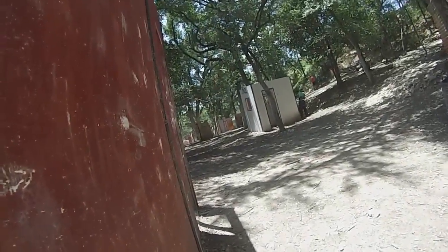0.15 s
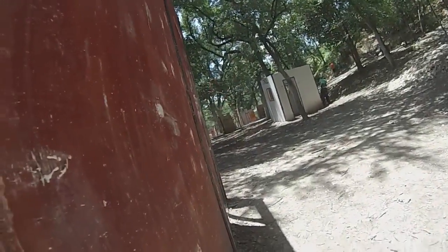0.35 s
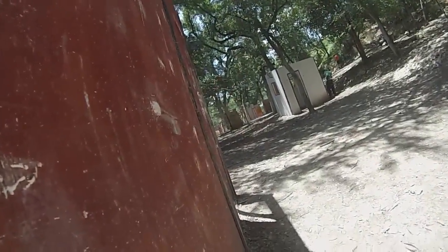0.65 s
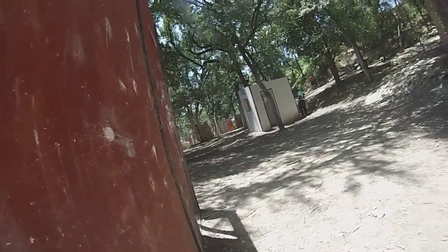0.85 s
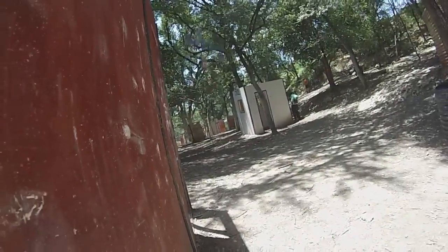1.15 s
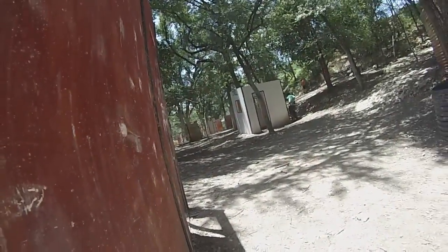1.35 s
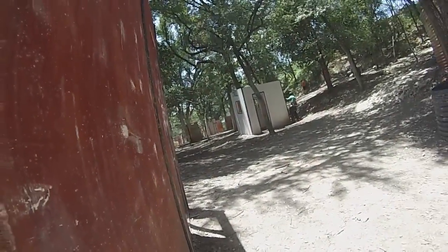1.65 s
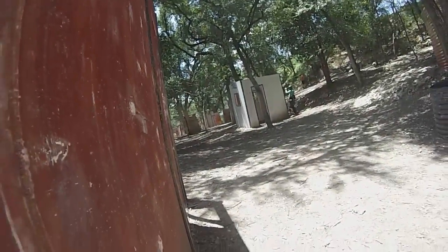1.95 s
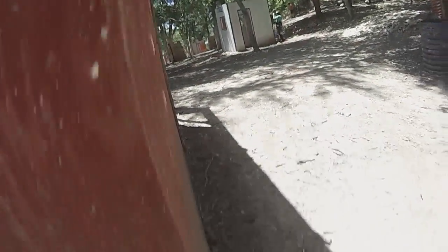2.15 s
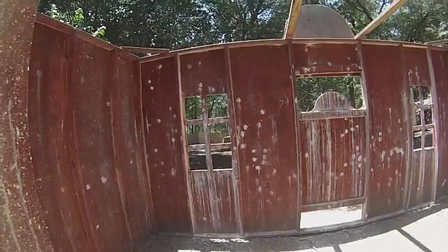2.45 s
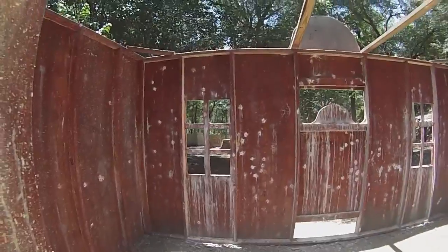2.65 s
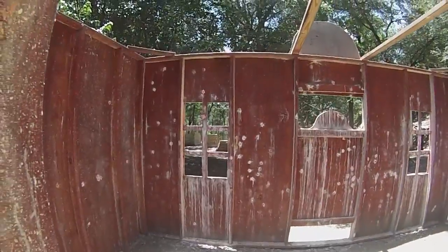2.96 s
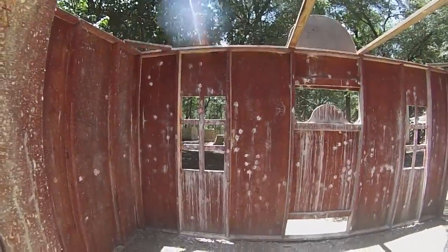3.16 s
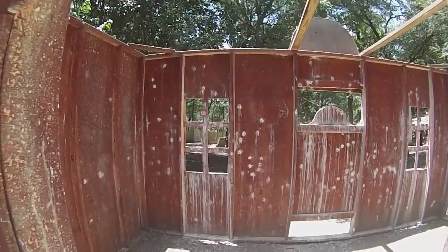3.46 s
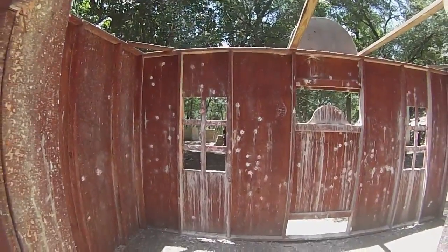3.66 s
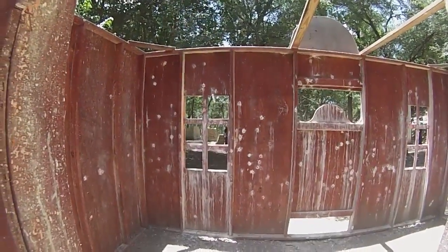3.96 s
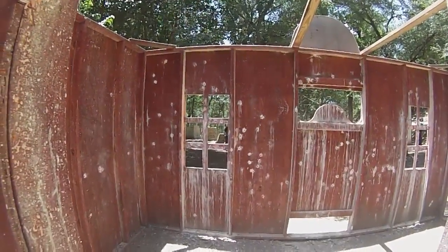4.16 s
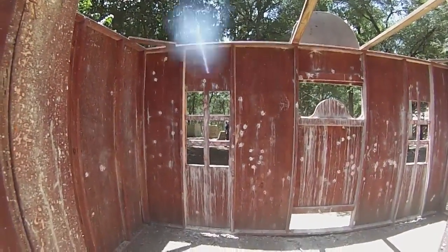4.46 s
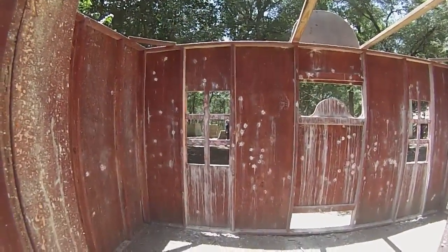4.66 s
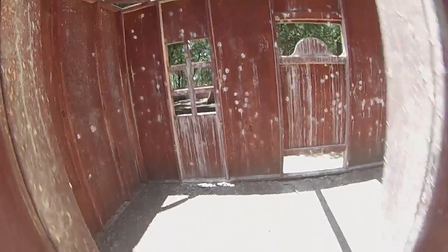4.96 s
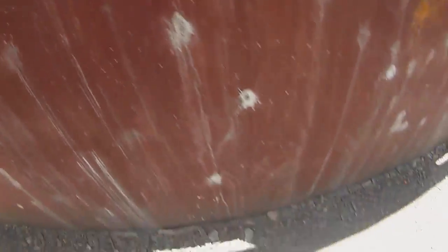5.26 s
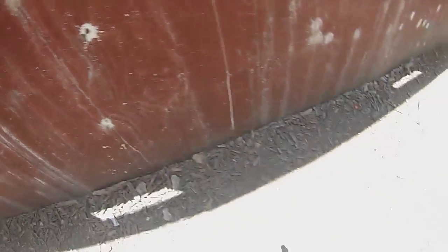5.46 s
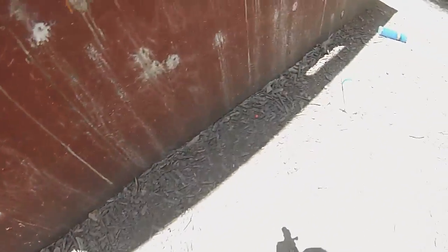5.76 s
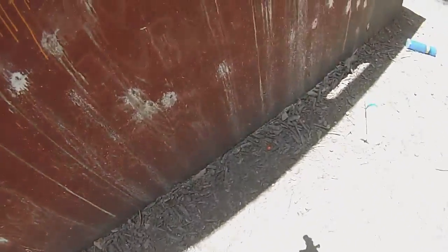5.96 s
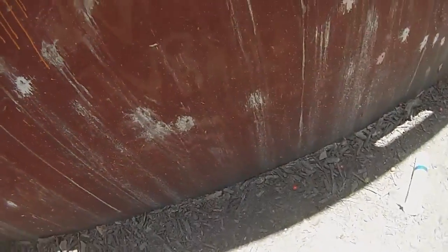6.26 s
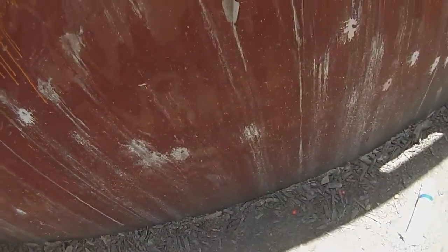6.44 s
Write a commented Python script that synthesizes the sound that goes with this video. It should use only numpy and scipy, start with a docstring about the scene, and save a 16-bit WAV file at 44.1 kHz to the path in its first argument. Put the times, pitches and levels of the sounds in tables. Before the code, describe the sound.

A paintball gun hammers out metallic shots at about thirteen a second, pauses with hollow knocks, fires again, then just rattles and bumps.

```python
"""Inside a closed housing clamped to a paintball marker, a microphone hears quick strings of shots through the mount.
Each shot excites body resonances with noisy metal contacts, as the trigger clicks and the bolt slams and returns;
a thin ring, a shove of recoil and a hiss of spent gas follow. Around the strings, random ball contacts ring
the hopper shell, handling shakes the springy mount and cloth and hands rustle faintly.
The capsule saturates, and gain control ducks the loud sounds, quickly down and slowly back."""
import sys
import numpy as np
from scipy import signal
from scipy.fft import rfft, irfft
from scipy.io import wavfile

SR = 44100
rng = np.random.default_rng(int(sys.argv[2]) if len(sys.argv) > 2 else 0)


def file_out(sig):
    """Save sig as 16-bit WAV at sys.argv[1]."""
    # one column per channel
    cols = np.atleast_2d(sig).T
    # limit, then scale
    lim = np.clip(cols, -1, 1)
    pcm = np.round(lim * 32767).astype(np.int16)
    wavfile.write(sys.argv[1], SR, pcm)


N = 291040  # samples

# Levels are in dB before the capsule and gain control; some sources add a fixed gain to theirs.
# Shots, with the bolt's return: start_s, slam_db, return_delay_ms, return_db
SHOT_CYCLES = [(0.0605, 4, 9.8, 5.5), (0.1354, 5.5, 10.4, 11.5), (0.3432, 9.5, 10.1, 11.5),
               (0.415, 12, 10.1, 14), (0.4934, 11.5, 9.6, 9), (0.6275, 9.5, 10.3, 13),
               (0.718, 6, 9.8, 12.5), (0.7951, 9.5, 10.5, 12), (0.8664, 11, 9.7, 14),
               (0.9388, 8.5, 10.8, 12.5), (1.0223, 10.5, 10, 13.5), (1.098, 11.5, 9.7, 13.5),
               (1.165, 11.5, 9.7, 13), (1.2345, 12.5, 10.8, 14.5), (1.3075, 8.5, 10.1, 9),
               (1.3879, 8.5, 10.1, 12), (1.4738, 9.5, 9.8, 12), (1.5382, 10, 10.6, 9.5),
               (1.615, 11, 9.4, 13), (1.6886, 9, 9.7, 13.5), (1.7592, 11.5, 9.3, 14), (1.8286, 9.5, 10, 13),
               (2.9742, 17, 10, 18), (3.2293, 14.5, 9.7, 16.5), (3.3088, 11, 9.5, 12.5),
               (3.448, 8.5, 10.2, 13.5), (3.545, 7, 9.5, 11.5), (3.6198, 8, 9.8, 14),
               (3.6868, 10, 9.6, 10.5), (3.7592, 10.5, 9.6, 12), (3.859, 8.5, 10, 12.5),
               (3.9455, 8.5, 9.9, 11.5), (4.0159, 10, 9.4, 13.5), (4.0849, 12, 9.9, 10),
               (4.1501, 7.5, 9.6, 12), (4.2505, 10, 10.2, 13.5), (4.3872, 7, 9.6, 11.5),
               (4.4645, 8, 9.6, 10), (4.5275, 11.5, 9.5, 13), (4.6271, 9.5, 10.3, 12.5)]
# Other bright ticks of trigger and bolt: start_s, level_db
TRIGGER_BOLT_TICKS = [(0.0004, 1.5), (0.226, -9.5), (0.2414, -7.5), (0.264, 4.5), (0.374, -9),
                      (0.462, -11.5), (0.5593, 7.5), (0.668, -8.5), (0.749, -10), (0.8932, -10),
                      (0.9646, -7.5), (1.0514, -12), (1.2675, -10), (1.943, -21.5), (2.9455, -17),
                      (2.9524, -9), (2.9571, -2), (2.962, -1.5), (2.9685, -1), (3.2181, -5.5), (3.2216, -5),
                      (3.266, -9), (4.0484, -16), (4.6943, -17), (4.9222, -36.5), (5.0463, -40),
                      (5.253, -39), (5.5115, -36), (6.1745, -36)]
# Small contacts in every cycle: before_slam_ms, level_db, hold_ms
LEAD_IN_CONTACTS = [(20.3, -35.5, 1.4), (17.07, -25, 0.45), (11.1, -16, 3.8), (5.13, -19.5, 7.0)]
# Marker body heard through the housing: pitch_hz, width_hz, level_db
BODY_MODES = [(373, 227, -9.5), (790, 820, -9.5), (1358, 295, -4), (2102, 253, -4.5), (2573, 358, -2),
              (3441, 232, 0), (4270, 770, -16.5), (6166, 300, -16.5), (8500, 2400, -32),
              (11500, 9000, -59.5)]
# Relative spectrum of the gas hiss: pitch_hz, density_db (per Hz)
GAS_SPECTRUM = [(710, -39.5), (1200, 4), (1290, -14.5), (1470, -5.5), (1970, -9), (2600, -2), (3310, -8.5),
                (3620, -11), (3920, -25), (5610, -15), (6170, -20), (6790, -22), (8210, -16.5),
                (15000, -51)]
# Loudest knocks of balls on the hopper shell: start_s, level_db, brightness_db
BALL_KNOCKS = [(0.29, -27, 22), (1.901, -21.5, 20), (2.066, -32.5, 22), (2.12, -21, 13), (2.252, -22, 0.5),
               (2.275, -19.5, 13.5), (2.372, -6, 4), (2.418, -18.5, 13), (2.463, -10.5, 0),
               (2.516, -13.5, -2), (2.537, -13.5, 2), (2.567, -12.5, 1), (2.592, -13, -6),
               (2.653, -16.5, -12), (2.683, -26.5, -8), (2.747, -24, 0.5), (2.772, -22, -1),
               (2.869, -20, -3), (2.939, -8, 4), (3.994, -20, 5), (4.065, -17, 5), (4.991, -14.5, 0.5),
               (5.253, -29.5, -0.5), (5.384, -7, 0.5), (5.473, -9.5, 3.5), (5.548, -11.5, 6),
               (5.593, -8.5, 8), (5.636, -12.5, 3.5), (5.67, -16, 6.5), (5.733, -9.5, 5),
               (5.778, -16.5, -5), (5.853, -13, -2), (5.893, -17, 4), (5.991, -6, -1), (6.006, -9.5, 6),
               (6.084, -5.5, 4.5), (6.121, -8.5, -1), (6.139, -10, -1.5), (6.155, -15, 4),
               (6.177, -7.5, -1), (6.23, -15, 3), (6.26, -17.5, 5.5), (6.303, -26.5, 8),
               (6.367, -12.5, 6.5), (6.548, -6, -11), (6.572, -14, 1)]
# Hopper shell resonances: pitch_hz, width_hz, level_db
SHELL_MODES = [(300.5, 180, -10), (546, 54, 3.5), (810, 115, 3.5), (1184, 281, -4.5), (1676, 230, -15.5),
               (2037, 280, -15), (2700, 726, -23.5), (3870, 1600, -46), (6300, 230, -47)]
# How hard the marker is shaken: time_s, thrum_db (mount), tumble_db (balls)
SHAKING = [(0.0, -37, -69), (0.15, -34, -48), (0.25, -30.5, -34), (0.45, -30.5, -39.5), (1.748, -26.5, -36),
           (1.88, -36, -33.5), (2.03, -27, -36), (2.2, -30, -35), (2.429, -18, -28.5), (2.58, -26, -44),
           (2.85, -30.5, -50), (2.931, -11, -23), (3.0, -27.5, -33), (3.2, -30, -39.5), (4.55, -32, -36.5),
           (4.681, -28.5, -39.5), (4.95, -28, -32), (5.11, -25.5, -32.5), (5.21, -34, -50),
           (5.33, -16.5, -24.5), (5.53, -17.5, -27), (5.649, -24, -34.5), (5.779, -20.5, -40),
           (5.95, -15.5, -21.5), (6.1, -14, -27.5), (6.32, -22.5, -39), (6.44, -24, -34), (6.6, -11, -20.5)]
# Jolts that set the mount swinging: start_s, level_db
MOUNT_JOLTS = [(1.99, -25), (2.299, -19.5), (2.422, -2.5), (2.468, -12.5), (2.521, -14), (2.69, -16),
               (2.89, -24), (2.925, -22), (2.96, -4), (5.508, -6.5), (5.537, -18), (5.629, -6), (5.703, -6),
               (5.808, -9), (5.916, 2), (6.18, -2.5), (6.398, -9), (6.552, -12)]
# Mount resonances: pitch_hz, width_hz, level_db
MOUNT_MODES = [(55, 40, -22), (99, 13, 0), (135, 24, -4), (200, 50, -22)]
# Faint treble rustle of cloth and hands: time_s, level_db
RUSTLE_LEVELS = [(0, -63), (2.05, -69), (2.35, -80), (2.9, -72.5), (4.75, -76), (5.9, -78.5), (6.37, -73.5),
                 (6.6, -65)]

# The trigger clicks ahead of each shot, fully after a pause, more softly the faster the finger goes.
TRIGGER_LEAD_MS, TRIGGER_DB, FULL_PULL_PAUSE_MS, TRIGGER_LOSS_DB_PER_MS = 25.7, -8.0, 99.0, 0.55
TICK_FALL_MS = 2.4
# Ring after each return: delay, mean height and spread from shot to shot
WHINE_AFTER_MS, WHINE_DB, WHINE_SPREAD_DB = 1.5, -28.0, 4.0
SNAP_S, SNAP_DB = 2.4224, -31.0
# The shaking comes in uneven lumps: rate and rms depth
LUMPS_PER_S, THRUM_LUMPS_DB, TUMBLE_LUMPS_DB = 9.0, 0.999, 1.11
CUTOFF_HZ = 16000


def amp(db):
    """Decibel law: convert a level in dB to a linear gain."""
    return 10 ** (np.asarray(db) / 20)


def rms_one(x):
    """Power normalisation: scale a signal to rms 1."""
    return x / np.sqrt(np.mean(x ** 2) + 1e-20)


def resonate(x, modes):
    """Modal superposition: parallel damped resonances with alternating signs."""
    out = 0
    for k, (hz, width, db) in enumerate(modes):
        r = np.exp(-np.pi * width / SR)
        sign = (-1) ** k
        b = sign * amp(db) * (1 - r * r) / 2 * np.array([1, 0, -1])
        a = [1, -2 * r * np.cos(2 * np.pi * hz / SR), r * r]
        out = out + signal.lfilter(b, a, x + 1e-18)
    return out


def bursts(times, dbs, holds_ms, fall_ms, rise_ms=0.22):
    """Transient envelope: a quick rise, a hold, then exponential decay, for every event."""
    out = np.zeros(N + 6000)
    t_ms = np.arange(6000) / SR * 1000
    for s, db, hold in np.broadcast(times, dbs, holds_ms):
        rise = np.minimum(t_ms / rise_ms, 1)
        fall = np.exp(-np.maximum(t_ms - hold, 0) / fall_ms)
        out[round(s * SR):][:6000] += amp(db) * rise * fall
    return out[:N]


def slow_noise(rate):
    """Low-passed randomness: noise of rms 1 that changes about rate times a second."""
    r = np.exp(-2 * np.pi * rate / SR)
    settled = signal.lfilter([1], [1, -2 * r, r * r], rng.standard_normal(N + 9000))[9000:]
    return rms_one(settled)


def flicker(rate, db):
    """Random amplitude modulation: a gain whose level wanders by db rms."""
    return amp(db * slow_noise(rate))


def repeated(times, share):
    """Partial coherence: contact noise partly alike in every cycle, since the same parts meet in the same way."""
    noise, pattern = rng.standard_normal(N + 400), rng.standard_normal(400)
    for at in np.round(times * SR).astype(int):
        fresh = noise[at:at + 400]
        noise[at:at + 400] = np.sqrt(share) * pattern + np.sqrt(1 - share) * fresh  # share of power
    return noise[:N]


def marker():
    """Impact excitation: metal contacts strike sharply, then chatter as short noise into the body resonances."""
    s, slam_db, lag_ms, return_db = np.transpose(SHOT_CYCLES)
    back = s + lag_ms / 1000
    noise = repeated(s, share=.4)
    contact = bursts(s, slam_db + 0.5, 2.32, fall_ms=0.62)
    contact += bursts(s, slam_db - 15.5, 0.84, fall_ms=2.7)
    for ms, db, hold in LEAD_IN_CONTACTS:
        contact += bursts(s - ms / 1000, db, hold, fall_ms=1.2)

    gap_ms = 1000 * np.diff(s, prepend=0)
    haste_ms = np.maximum(FULL_PULL_PAUSE_MS - gap_ms, 0)
    trigger_db = TRIGGER_DB - TRIGGER_LOSS_DB_PER_MS * haste_ms
    contact += bursts(s - TRIGGER_LEAD_MS / 1000, trigger_db, 0.42, fall_ms=TICK_FALL_MS)
    contact += bursts(*np.transpose(TRIGGER_BOLT_TICKS), 0.67, fall_ms=TICK_FALL_MS)

    strike = -bursts(s, slam_db + 5, 0.077, fall_ms=0.042, rise_ms=0.067)
    rebound = bursts(back, return_db, 2.7, fall_ms=2.41) * repeated(back, share=0.34)
    body = resonate(contact * noise + strike + rebound, BODY_MODES)
    # The bolt rings on at its own pitches after the return.
    bolt = resonate(rebound, [(3235, 110, 3.0), (6330, 130, -8.5), (2680, 52, -9.5)])
    return amp(9.5) * body + amp(7.0) * bolt


def gas():
    """Turbulent jet noise: spent gas hisses after each shot; an earlier shot's hiss is still dying at the start."""
    hz = np.maximum(np.arange(N // 2 + 1) * SR / N, 1)
    point_hz, point_db = np.transpose(GAS_SPECTRUM)
    colour = amp(np.interp(np.log(hz), np.log(point_hz), point_db))
    hiss = rms_one(irfft(rfft(rng.standard_normal(N)) * colour, N))
    shot_s = np.transpose(SHOT_CYCLES)[0]
    flow = bursts(shot_s + 0.0013, -33, 70.0, fall_ms=12.0, rise_ms=3.4)
    flow += bursts([0], [-38], 27.0, fall_ms=2.2)
    return hiss * flow


def recoil():
    """Momentum exchange: the slam shoves the housing, the venting pulls it back and the mount damps the swing."""
    s, slam_db, _, _ = np.transpose(SHOT_CYCLES)
    shove = bursts(s + 0.0027, slam_db, 0.98, fall_ms=1.1, rise_ms=0.67)
    pull = bursts(s + 0.00693, slam_db + 2.5, 2.86, fall_ms=0.86, rise_ms=4.7)
    swing = resonate(shove - pull, [(127, 138, 4.5), (94.7, 33, -0.5), (324, 280, -8.0)])
    return amp(-7) * swing


def whine():
    """Free vibration: two lightly damped modes, probably springs; the higher is fainter and lasts longer."""
    s, _, lag_ms, _ = np.transpose(SHOT_CYCLES)
    db = WHINE_DB + WHINE_SPREAD_DB * rng.standard_normal(len(s))
    kick, width_hz = np.zeros(N), 16.0
    at = np.round((s + (lag_ms + WHINE_AFTER_MS) / 1000) * SR).astype(int)
    kick[at] = amp(db) * SR / (2 * np.pi * width_hz)  # makes the lower ring as high as db says
    return resonate(kick, [(1830, width_hz, 0), (3610, 2.5, -26)])


def snap():
    """Broadband impulse: one thin click of unfiltered noise, about a millisecond, as the mount is jolted."""
    return bursts([SNAP_S], [SNAP_DB], 0.69, fall_ms=0.5, rise_ms=0.046) * rng.standard_normal(N)


def hopper(level_db):
    """Stochastic impacts: many small ball contacts of uneven size, and the loud knocks, ring the shell."""
    sizes = amp(4.6 * np.minimum(rng.exponential(1, N), 3.5)) * rng.choice([-1, 1], N)
    contacts_per_s = 900.0 * flicker(25.0, 5.0)
    grains = sizes * (rng.random(N) < contacts_per_s / SR)
    tumble = rms_one(resonate(rms_one(grains) + 0.51 * rng.standard_normal(N), SHELL_MODES))

    s, db, bright_db = np.transpose(BALL_KNOCKS)
    noise = rng.standard_normal(N)
    dull = resonate(noise * bursts(s, db + 11, 0.91, fall_ms=4.5), SHELL_MODES[:5])
    bright = resonate(noise * bursts(s, db + 11.5 + bright_db, 0.28, fall_ms=3.2), SHELL_MODES[5:])
    soft = signal.butter(1, 3500, fs=SR, output="sos")  # gelatine balls touch softly
    return signal.sosfilt(soft, amp(level_db) * tumble + dull + bright)


def mount(level_db):
    """Forced vibration: handling drives the springy mount's low resonances with lumpy noise and single jolts."""
    s, db = np.transpose(MOUNT_JOLTS)
    jolts = resonate(bursts(s, db + 15.5, 1.7, fall_ms=1.6, rise_ms=2.3), MOUNT_MODES[1:])
    shaking = rng.standard_normal(N) * flicker(14.0, 2.2)
    thrum = rms_one(resonate(shaking, MOUNT_MODES))
    return jolts + amp(level_db) * thrum


def rustle():
    """Friction noise: faint patchy treble of cloth and hands gets through the housing."""
    s, db = np.transpose(RUSTLE_LEVELS)
    modes = [(3900, 980, 5.5), (6400, 900, -0.5), (8460, 2000, -8.5)]
    level = amp(np.interp(np.arange(N) / SR, s, db))
    treble = rms_one(resonate(rng.standard_normal(N), modes))
    return level * flicker(40.0, 1.9) * treble


def scene():
    """Linear superposition: all sources add at one microphone, which feeds both channels."""
    s, thrum_db, tumble_db = np.transpose(SHAKING)
    t = np.arange(N) / SR
    lumps = slow_noise(LUMPS_PER_S)  # shared by balls and mount
    balls = hopper(np.interp(t, s, tumble_db) + TUMBLE_LUMPS_DB * lumps)
    handling = mount(np.interp(t, s, thrum_db) + THRUM_LUMPS_DB * lumps)
    mono = marker() + gas() + recoil() + whine() + snap() + balls + handling + rustle()
    return np.stack([mono, mono])


def record(dry):
    """Nonlinear transduction: capsule saturation, gain control, hard overload, then bass and treble cut."""
    level_db = 20 * np.log10(np.abs(dry[0]) + 1e-9)
    over_db = np.clip(level_db + 3.4, 0, 17.0)
    release = 159.0 * np.arange(N) / SR  # 159 dB per s
    held_db = np.maximum.accumulate(over_db + release) - release
    r = np.exp(-1 / (0.0064 * SR))  # 6.4 ms attack
    reduction_db = signal.lfilter([1 - r], [1, -r], held_db)
    capsule = 3.36 * np.tanh(dry / 3.003)
    x = capsule * amp(-reduction_db)
    x = .95 * x / (1 + np.abs(x / .95) ** 4) ** .25  # hard overload towards 0.95
    x = signal.sosfilt(signal.butter(1, 25, "high", fs=SR, output="sos"), x)
    x = signal.sosfilt(signal.butter(2, 12000, fs=SR, output="sos"), x)
    x = signal.sosfilt(signal.cheby2(12, 70, CUTOFF_HZ, fs=SR, output="sos"), x)
    return np.clip(x, -1, 1)


dry = scene()
out = record(dry)
file_out(out)
```